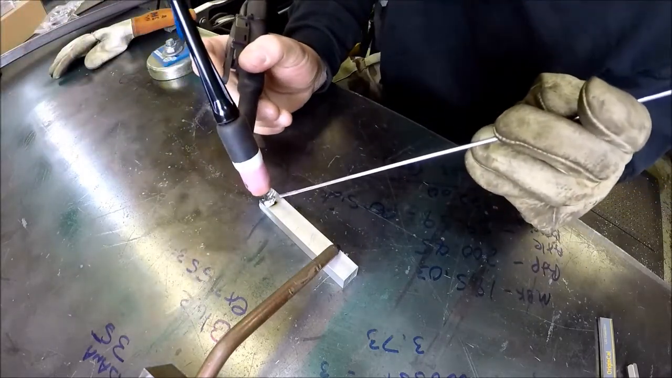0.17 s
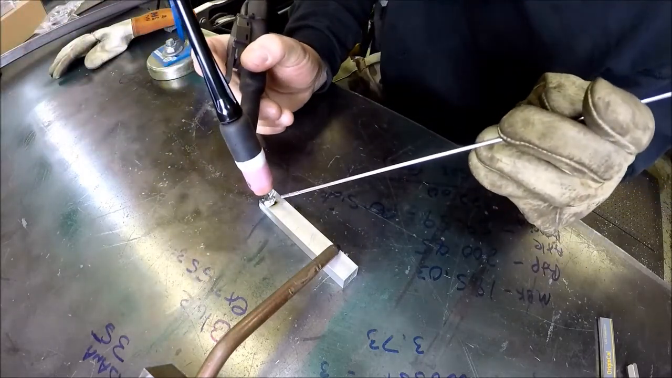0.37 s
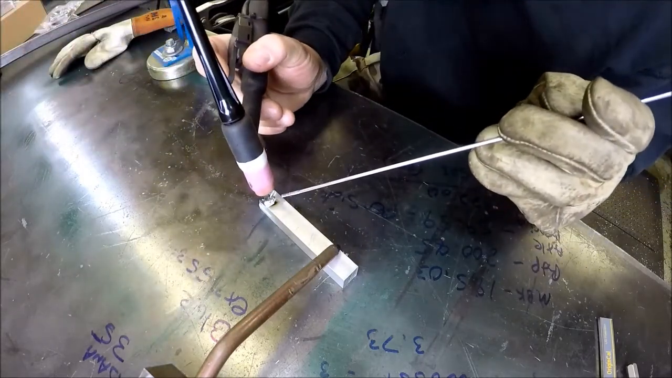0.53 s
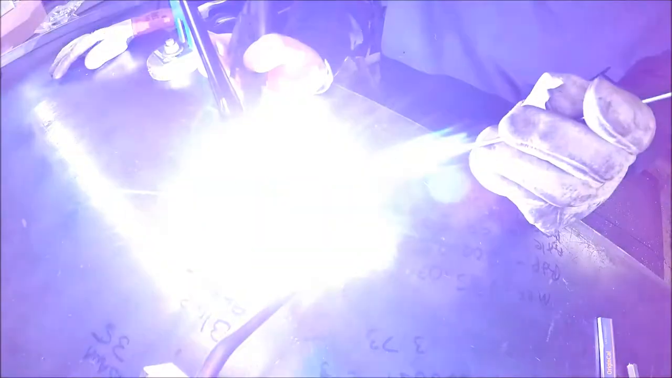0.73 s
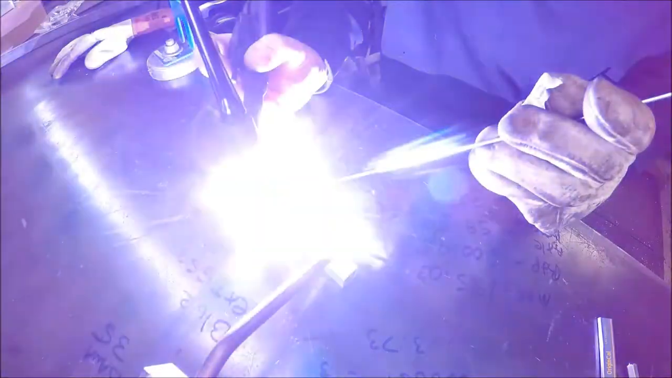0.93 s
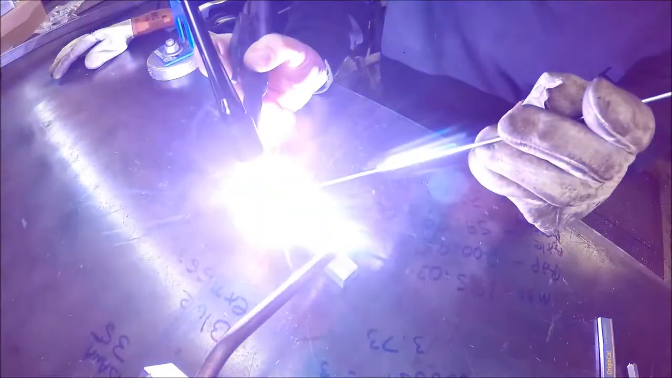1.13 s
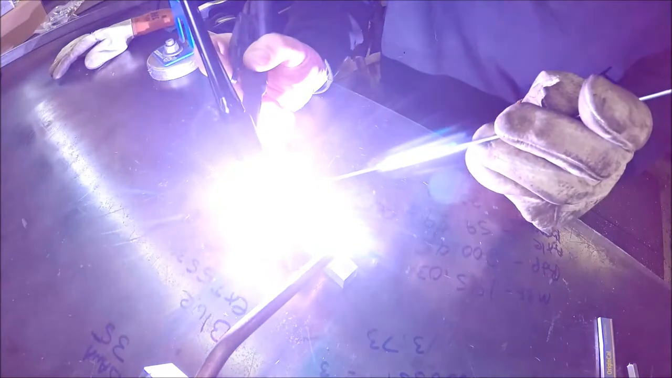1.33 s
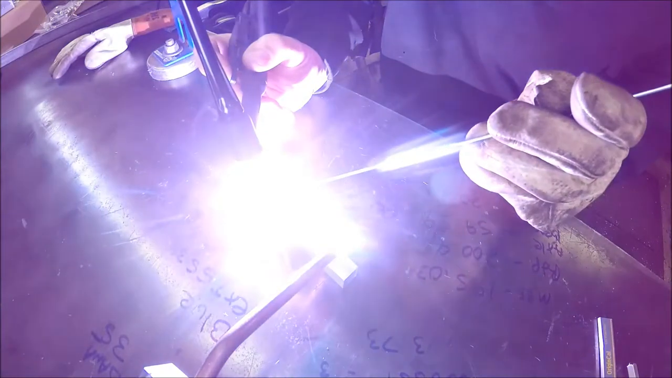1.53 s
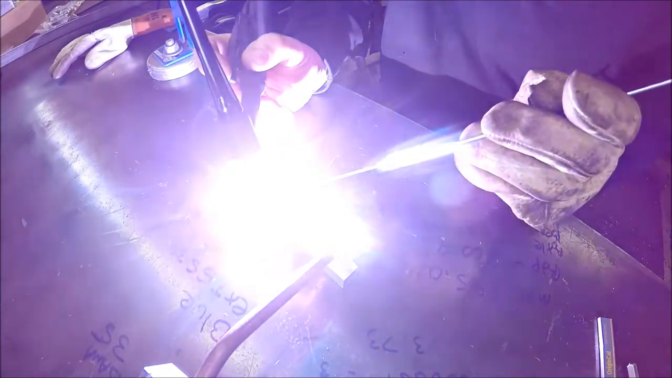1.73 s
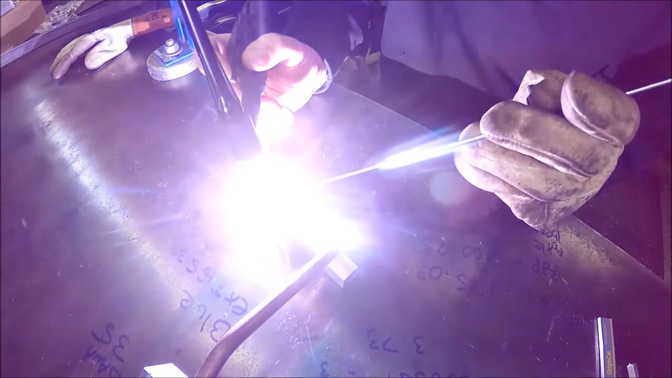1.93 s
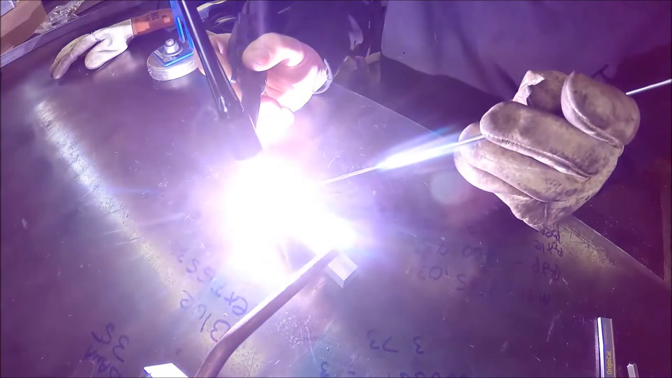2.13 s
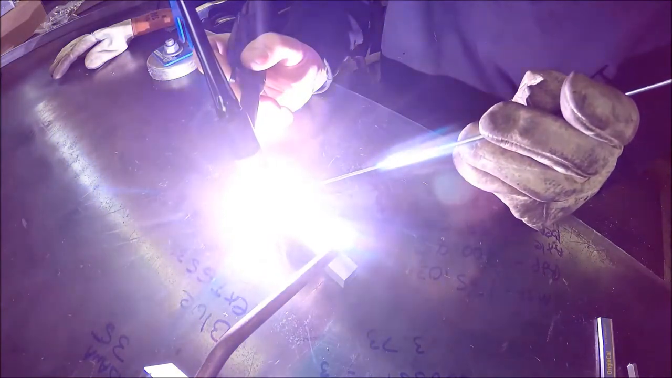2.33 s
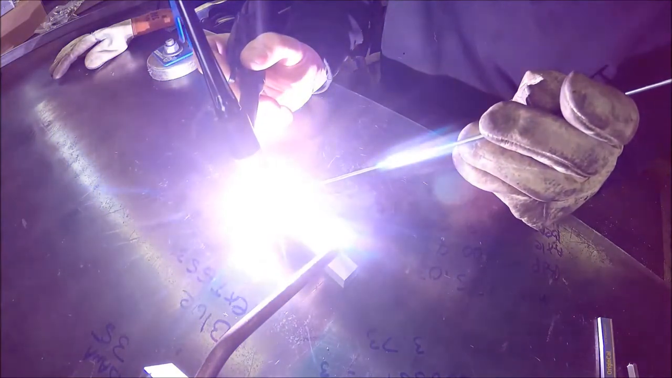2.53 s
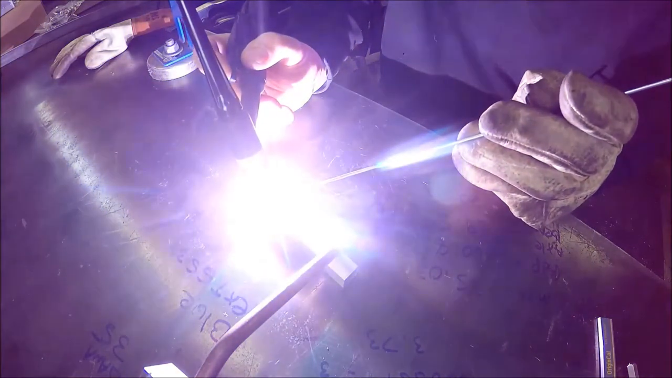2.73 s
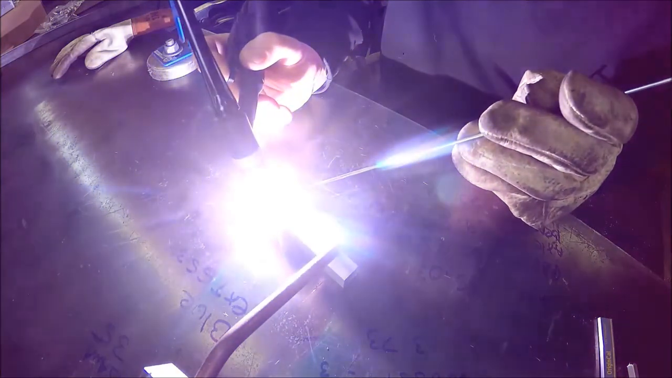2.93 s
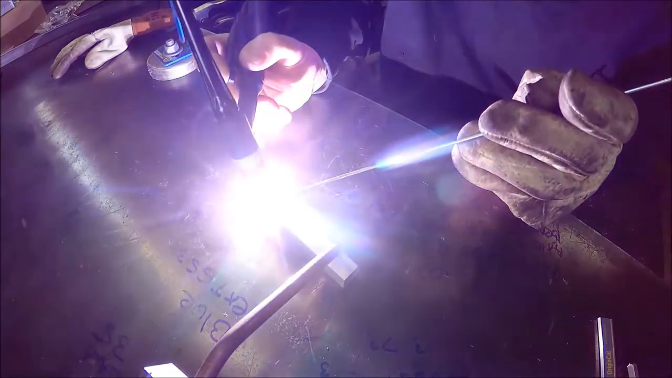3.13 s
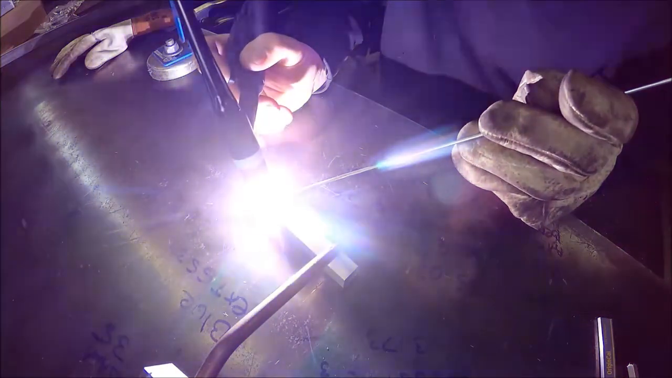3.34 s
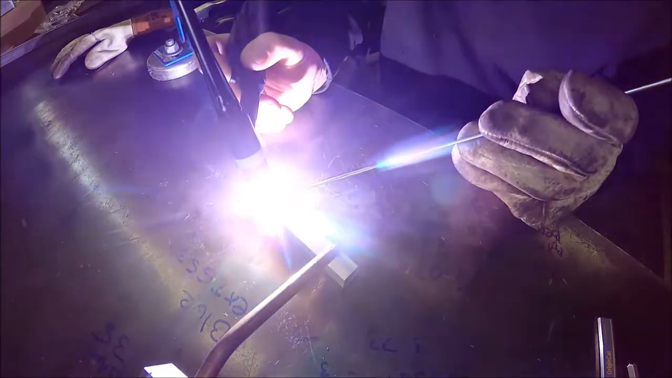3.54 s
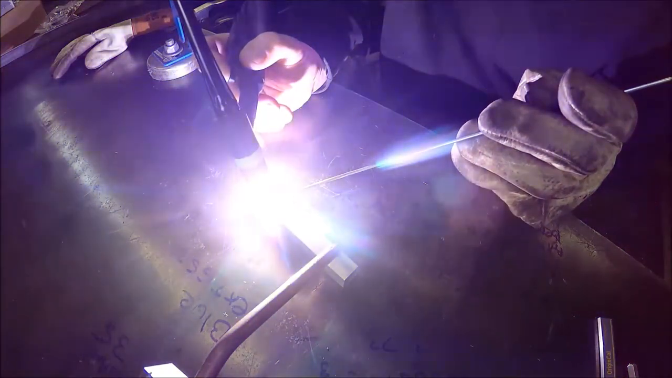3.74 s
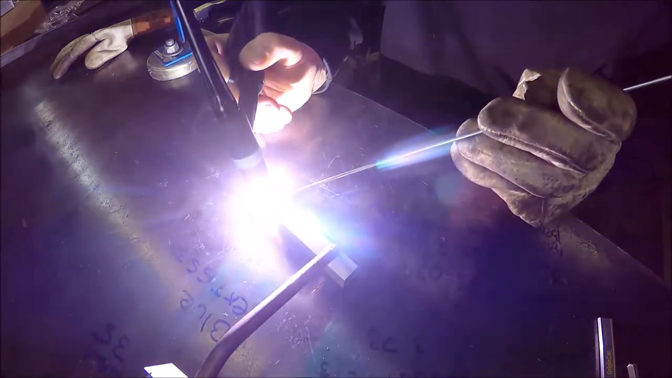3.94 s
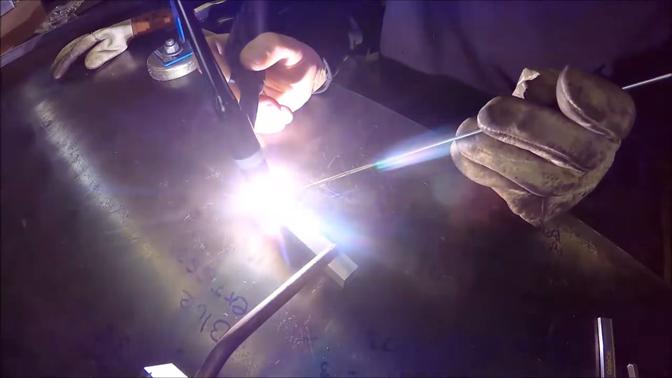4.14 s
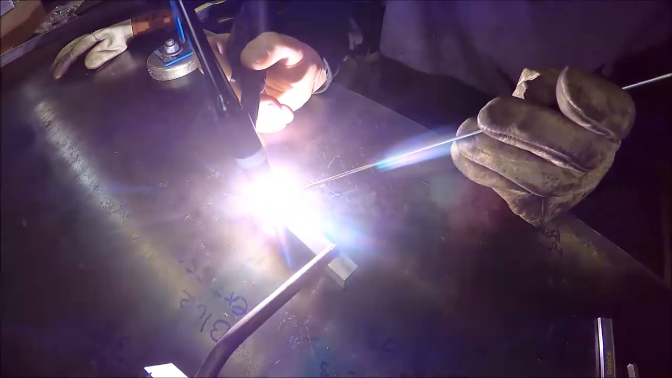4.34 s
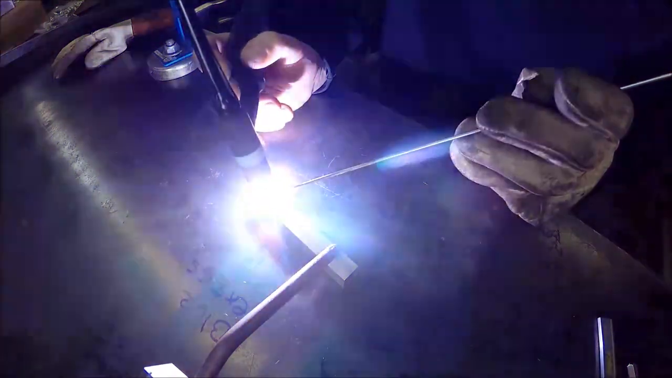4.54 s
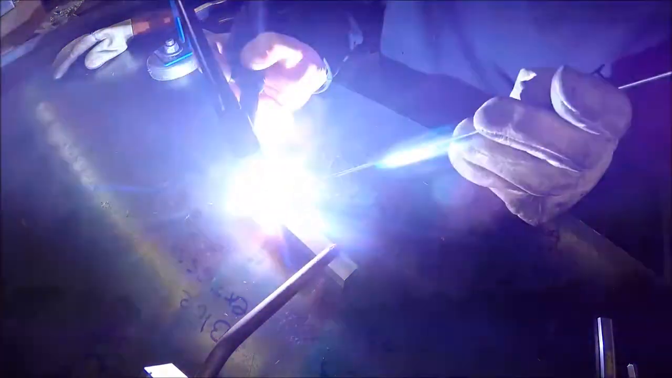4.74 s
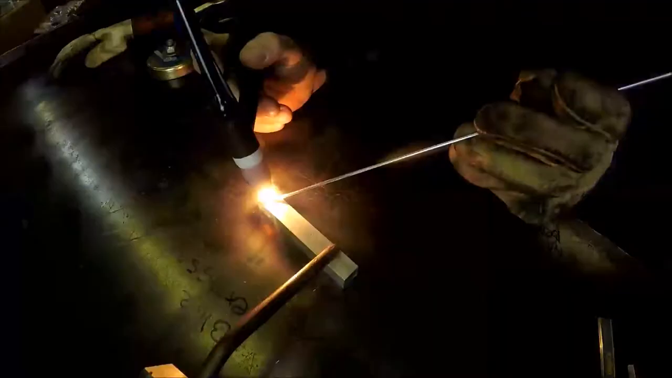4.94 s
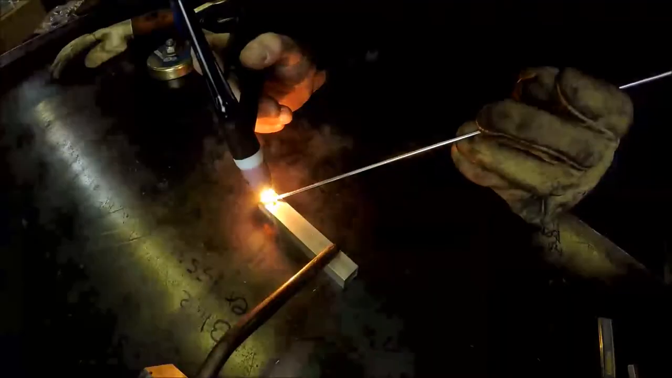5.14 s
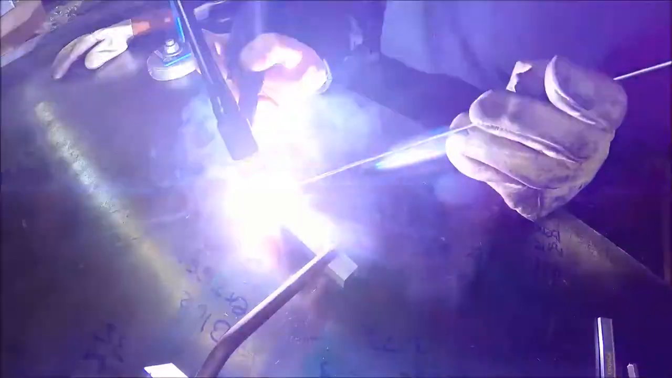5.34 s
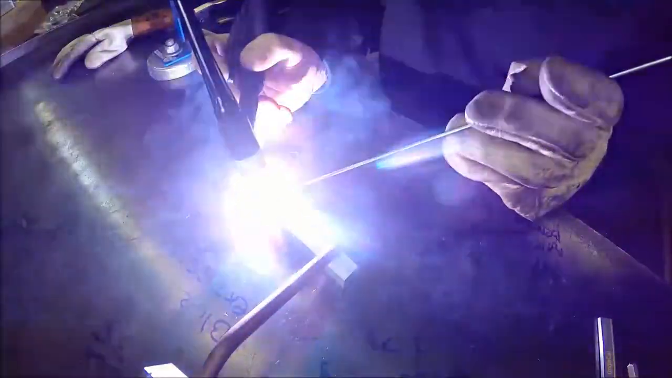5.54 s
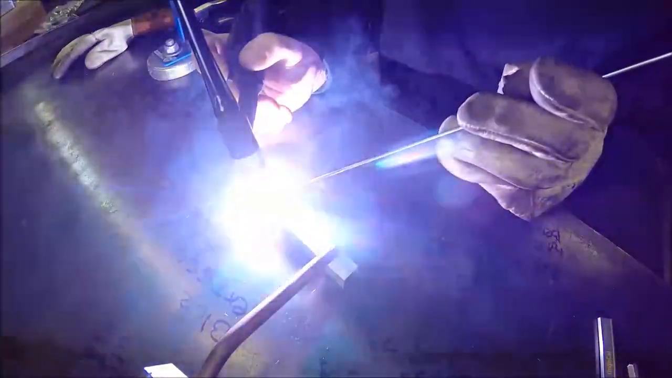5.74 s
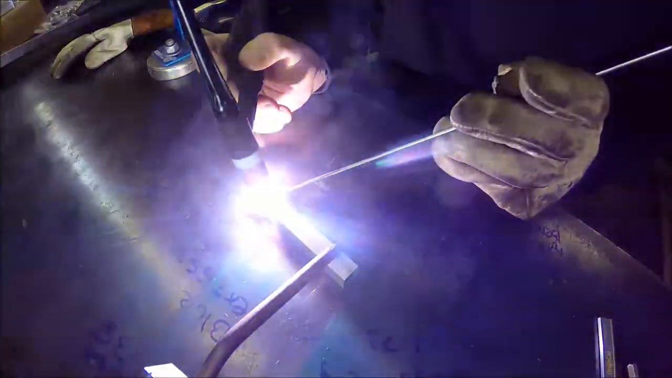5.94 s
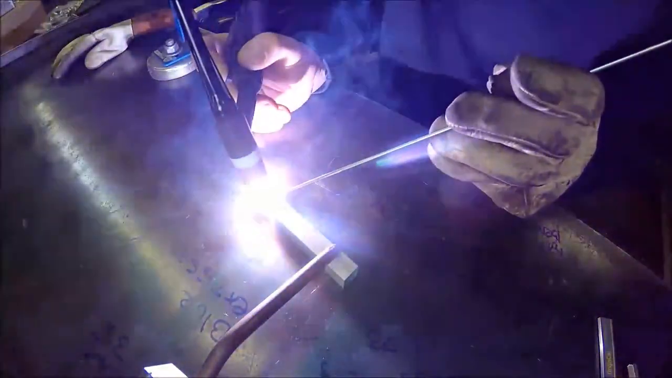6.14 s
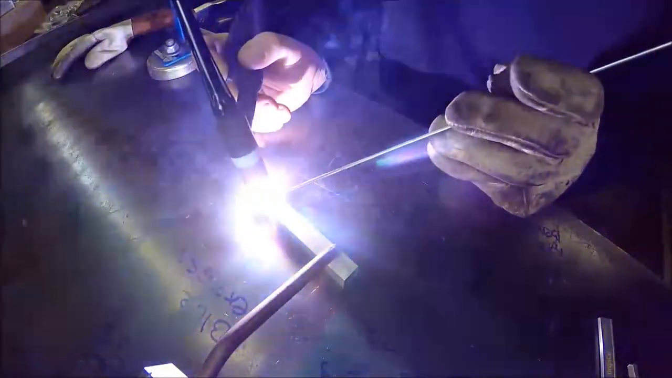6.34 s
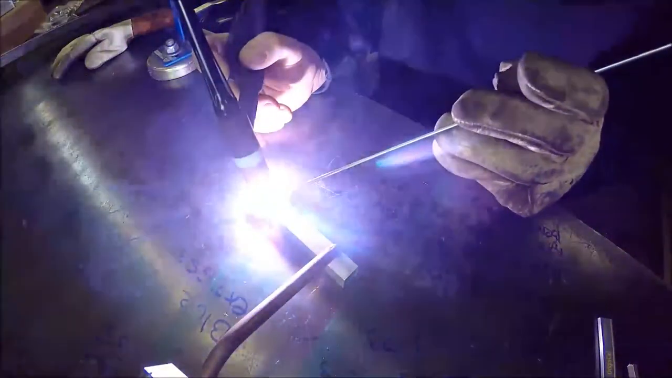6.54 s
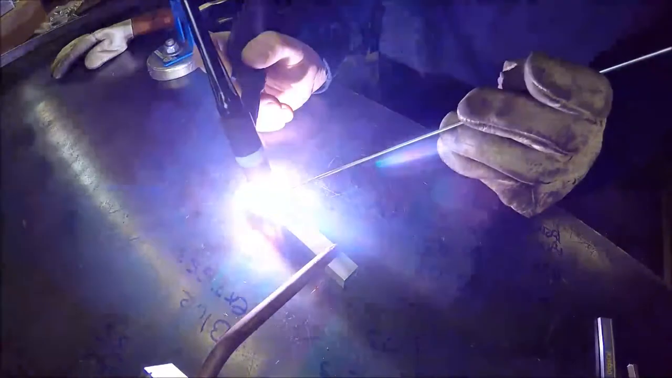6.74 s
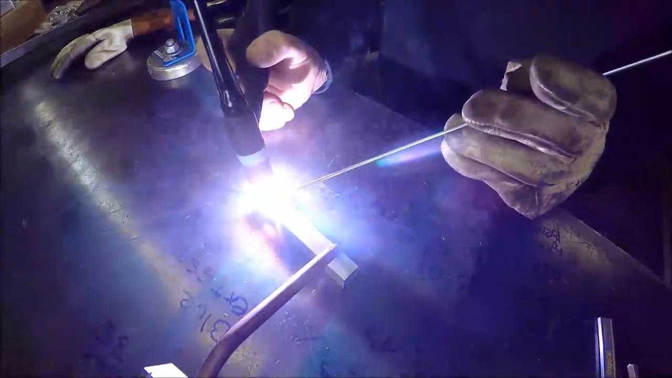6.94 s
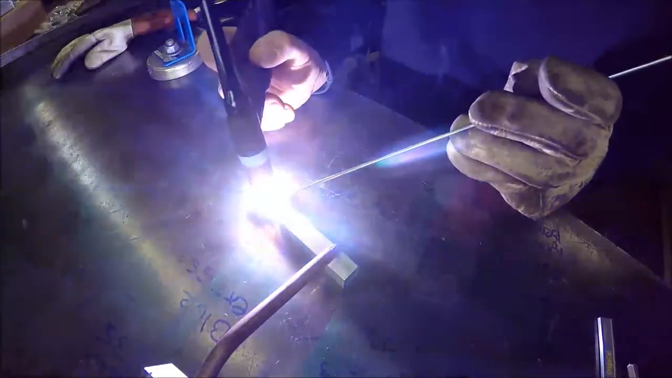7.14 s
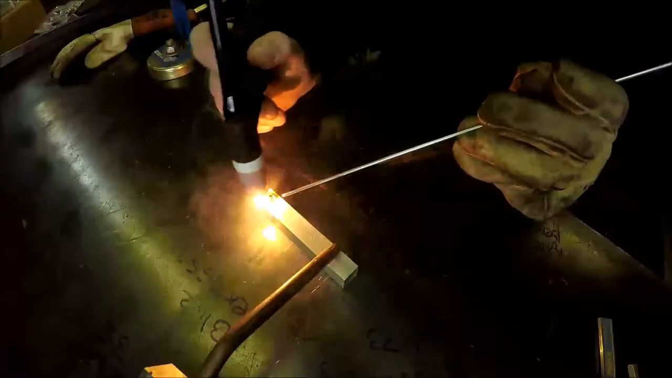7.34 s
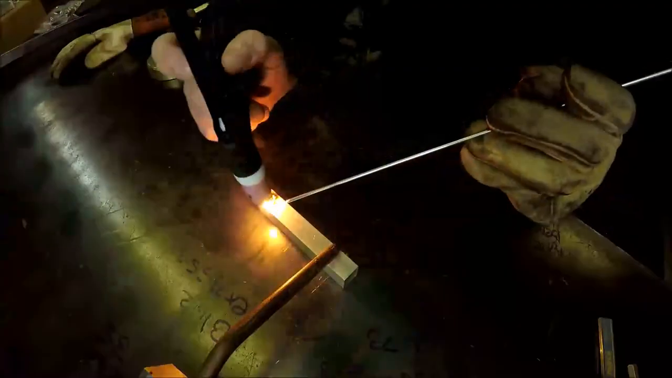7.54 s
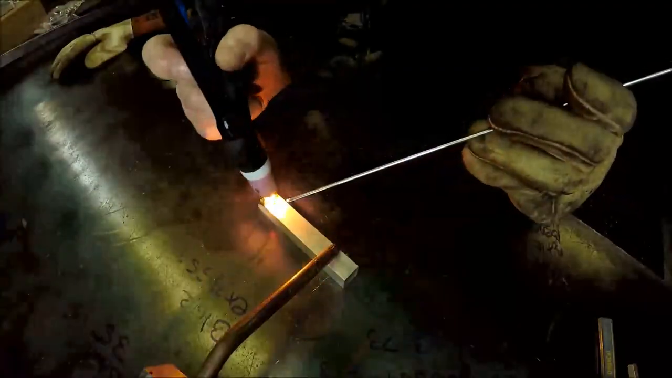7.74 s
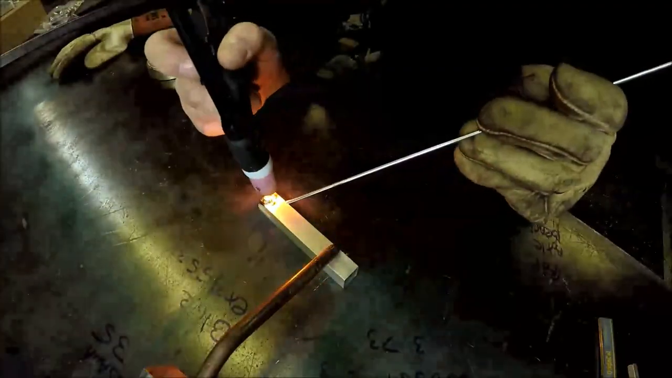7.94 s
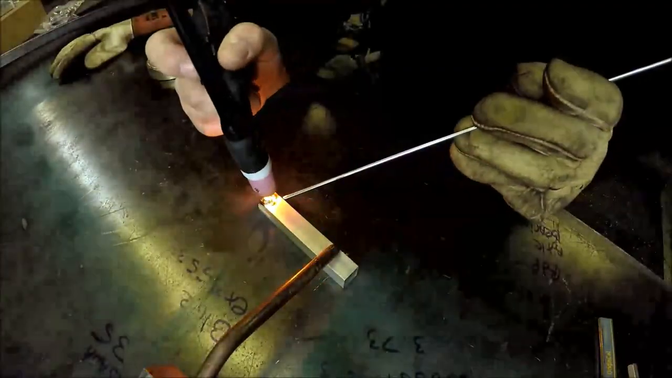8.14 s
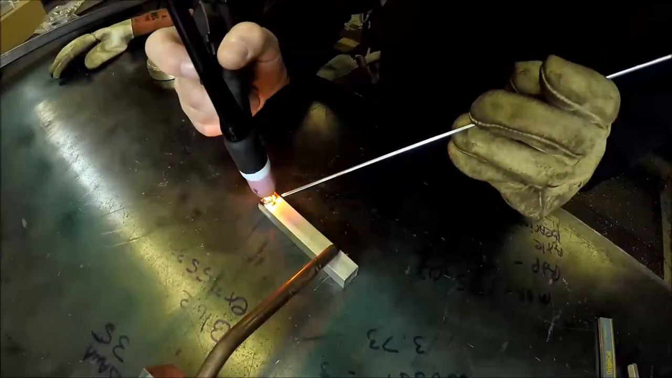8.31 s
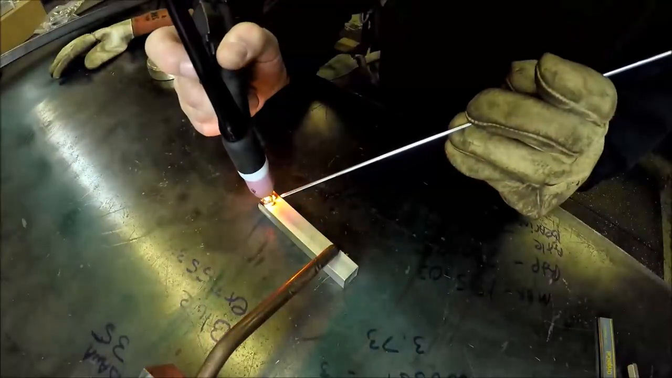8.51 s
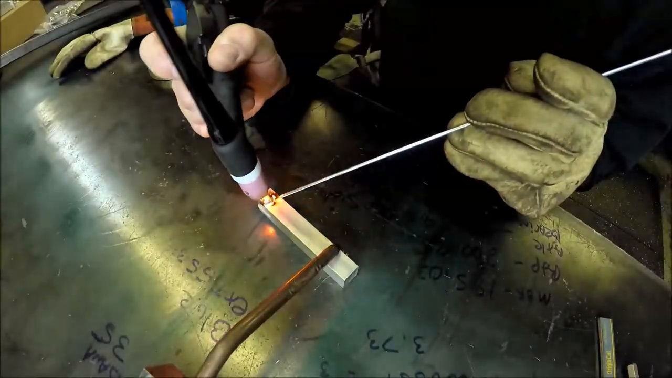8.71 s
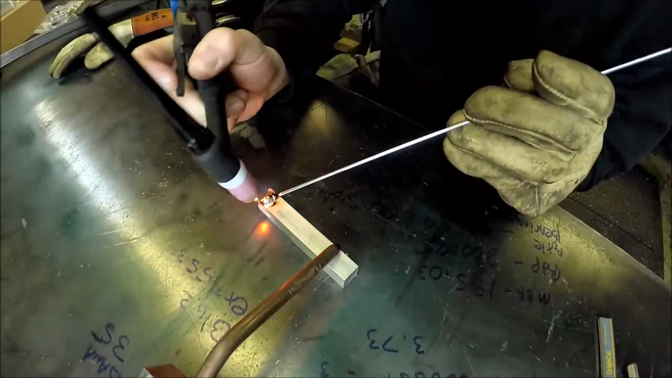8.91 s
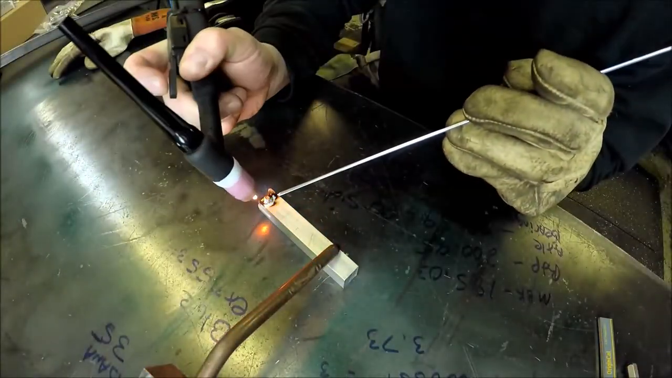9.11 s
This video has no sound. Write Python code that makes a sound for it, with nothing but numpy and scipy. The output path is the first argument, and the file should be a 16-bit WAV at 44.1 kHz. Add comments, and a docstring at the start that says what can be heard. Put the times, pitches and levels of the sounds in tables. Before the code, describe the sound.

Two bursts of loud, crackling arc buzz from welding aluminium, followed by a soft gas hiss and machine hum.

```python
"""A welder's fan hums; then come a tick, a hiss of shielding gas and the harsh rattle of an arc.
An AC TIG torch (an electric arc under gas) welds aluminium on a steel bench in two burns.
The current reverses twice a cycle, 32 cycles a second: each reversal cracks, and the short cleaning
phase between them sizzles. Gain control turns the gas and fan down while the loud arc burns."""
import sys
import numpy as np
from scipy import signal
from scipy.fft import rfft, irfft
from scipy.io import wavfile
from scipy.ndimage import uniform_filter1d, minimum_filter1d, map_coordinates

SR = 44100
rng = np.random.default_rng(int(sys.argv[2]) if len(sys.argv) > 2 else 0)


def digitize_waveform(pressure):
    """Quantize a signal to 16-bit integers and store it at the path in sys.argv[1].

    Rows of a 2-D input are taken as channels; values are limited to [-1, 1].
    """
    field = np.atleast_2d(pressure).T
    bounded = np.clip(field, -1, 1)
    quanta = np.round(bounded * 32767).astype(np.int16)
    wavfile.write(sys.argv[1], SR, quanta)


N = 404397
TIME = np.arange(N) / SR
CYCLE_HZ, CLEANING_S = 32.0105, .011045
# The arc flares and relights harder. Each row: start and length in seconds, puff and added thump in dB.
FLARES = [(.773, .041, -26, 0), (.83, 0.12, -33, 1.5), (1.82, 0.04, -33, 5), (4.475, 0.11, -29.5, 2.5),
          (4.6, 0.24, -33.5, 4), (5.575, 0.054, -34, 6.5), (5.64, .11, -44, 9)]


def amp(db):
    """Turns decibels into a gain."""
    return 10 ** (np.asarray(db) / 20)


def unit(x):
    """Scales a sound to an average level (rms) of 1."""
    return x / np.sqrt(np.mean(x ** 2) + 1e-20)


def read(points, hz):
    """Looks up a table at the given frequencies, joining its rows on a log-frequency axis."""
    row_hz, value = np.transpose(points)
    return np.interp(np.log(hz + 1), np.log(row_hz + 1), value)


def follow(rows, t):
    """Looks up each column of a timetable at the times t."""
    times, *columns = np.transpose(rows)
    return [np.interp(t, times, column) for column in columns]


def noise(colour):
    """Steady noise at rms 1. Each row of a colour: frequency in Hz, relative level in dB."""
    gain = amp(read(colour, np.fft.rfftfreq(N, 1 / SR)))
    return unit(irfft(rfft(rng.standard_normal(N)) * gain, N))


def drift(hz):
    """A random wander at rms 1, mostly slower than hz."""
    gain = np.exp(-(np.fft.rfftfreq(N, 1 / SR) / hz) ** 2)
    return unit(irfft(rfft(rng.standard_normal(N)) * gain, N))


def welder(blade_hz=383):
    """The mains hums, and the cooling fan adds a steady blade tone and a rush of air."""
    mains = [(119.8, -57), (239.6, -57)]  # Hum tones. Each row: frequency in Hz, level in dB.
    fan = [(1, -48), (2, -60.5), (3, -61), (4, -60), (5, -58.5)]  # Blade tones. Each row: multiple of the blade rate, level in dB.
    air_colour = [(20, -28), (50, 2.5), (85, -8.5), (130, 2), (170, -7), (240, 4.5), (330, -3), (560, -8.5),
                  (800, -6), (1300, -9.5), (1900, -7.5), (2600, -17), (4200, -19.5), (8000, -35),
                  (15000, -46)]  # Rushing air. Each row: frequency in Hz, relative level in dB.
    hum = sum(amp(db) * np.sin(2 * np.pi * (hz * TIME + rng.random())) for hz, db in mains)
    passes = np.cumsum(blade_hz * (1 + .002 * drift(8))) / SR
    blades = sum(amp(db + .7 * drift(10)) * np.sin(2 * np.pi * (k * passes + rng.random()))
                 for k, db in fan)
    air = amp(-42.5) * noise(air_colour) * amp(.5 * drift(22))
    return np.sqrt(2) * (hum + blades) + air


def switch(start_s=.6205, decay_s=.0015):
    """A switch gives a tiny bright tick just before the gas starts."""
    age = np.maximum(TIME - start_s, 0)
    return amp(-37.5) * (age > 0) * np.exp(-age / decay_s) * noise([(2000, -20), (6000, -2), (15000, -6)])


def gas(on_s=.763, rise_s=.012, flow_db=-40.5, surge_db=10, surge_s=1.4, work_echo_db=-8):
    """Gas surges from the torch's cup and settles; echoes make its hiss hollow, shifting as it moves."""
    # The jet's hiss and its high fizz. Each row: frequency in Hz, relative level in dB.
    hiss_colour = [(200, -0.5), (700, -5), (1800, 0.5), (2800, 5), (4200, -1), (5200, -1), (6500, 3),
                   (7500, 0), (8600, -5), (10300, 0), (11600, -14), (13500, -13), (15500, -29)]
    fizz_colour = [(8000, -40), (11500, -12), (12700, -5), (13500, -2), (14600, -3), (15600, -10)]
    # The torch moves. Each row: time in seconds, echo delay off the work in ms, fizz level in dB.
    torch = [(7.4, 0.16, -55), (7.75, .14, -50), (7.93, .18, -51), (8.08, 0.14, -54), (8.7, .14, -55),
             (8.95, .13, -46.5)]
    # Later echoes off cup and bench. Each row: final delay in ms, level in dB, sign (-1 flips the wave).
    far_echoes = [(.694, -18, -1), (.932, -18.5, 1), (1.43, -19, -1), (1.782, -20.5, 1)]
    delay_ms, fizz_db = follow(torch, TIME)
    age = np.maximum(TIME - on_s, 0)
    hiss_db = flow_db + surge_db * np.exp(-age / surge_s)
    hiss = noise(hiss_colour) * amp(hiss_db + 1.2 * drift(20))
    jet = np.minimum(age / rise_s, 1) * (hiss + noise(fizz_colour) * amp(fizz_db))
    moved_ms = delay_ms - delay_ms[-1]  # all paths change alike
    paths = [(delay_ms, amp(work_echo_db))]
    paths += [(ms + moved_ms, sign * amp(db)) for ms, db, sign in far_echoes]
    echoes = sum(gain * map_coordinates(jet, [(TIME - ms / 1000) * SR], order=3) for ms, gain in paths)
    return (jet + echoes) / np.sqrt(1 + sum(gain ** 2 for ms, gain in paths))


def room(x):
    """The workshop answers with a short wash of echoes; the highs die before the lows."""
    decay_times = [(100, 0.34), (600, 0.46), (2000, 0.18), (6000, 0.092), (15000, 0.25)]  # Each row: frequency in Hz, seconds to fade by 60 dB.
    colour = [(100, 16.5), (600, -1), (1800, -0.5), (3000, 2.5), (4200, 17), (6000, -2.5), (15000, -6)]  # The room's tone. Each row: frequency in Hz, relative level in dB.
    hz, t, spectrum = signal.stft(rng.standard_normal(SR // 2), SR, nperseg=256)
    decay = amp(read(colour, hz)[:, None] - 60 * t / read(decay_times, hz)[:, None])
    tail = signal.istft(spectrum * decay * np.minimum(t / .0023, 1), SR, nperseg=256)[1]
    return signal.oaconvolve(x, tail / np.linalg.norm(tail))[:N]


def bench(x):
    """Adds close echoes, and metal that rings faintly at each strike."""
    echoes = [(.37, -53), (.87, -34.5), (1.42, -15.5), (2.05, -20.5), (2.4, -34), (7.5, -46), (9.15, -25),
              (12.95, -30)]  # Off work, bench and welder. Each row: delay in ms, level in dB.
    # Work, bench and torch ring. Each row: pitch in Hz, relative level in dB, seconds to fade by 60 dB.
    rings = [(1286, -27.5, 0.13), (2164, -30.5, 0.11), (2640, -18.5, 0.042), (2976, -19, 0.047),
             (3145, -28, 0.092), (3698, -27, 0.047), (5794, -25.5, 0.079), (5870, -31, 0.05),
             (6882, -38, 0.042), (8963, -34, 0.11), (12340, -14.5, 0.016), (14730, -21, 0.0083)]
    out, t = x.copy(), np.arange(SR // 6) / SR
    for ms, db in echoes:
        out += amp(db) * np.interp(TIME - ms / 1000, TIME, x, left=0)
    ring = 0
    for hz, db, fade_s in rings:
        energy = fade_s * SR / (4 * np.log(1000))
        ring += amp(db - 60 * t / fade_s) * np.sin(2 * np.pi * hz * t) / np.sqrt(energy)
    return out + amp(1) * signal.oaconvolve(x, ring)[:N]


def flare_arches():
    """Each flare rises from 0 to 1 and falls back: one curve per flare."""
    return np.array([np.sin(np.pi * np.clip((TIME - s) / length, 0, 1)) for s, length, _, _ in FLARES])


def puffs():
    """The flaring arc pushes the air in low gusts."""
    gusts = amp(np.array(FLARES)[:, 2]) @ flare_arches()
    return gusts * noise([(15, -19), (40, 6), (130, 5), (300, 7), (700, -36)])


def heating(arc, span, fry_db, hold_s, treble_db, fry_fade_db_per_s=33, treble_fade_db_per_s=1):
    """The metal's cold oxide skin fries; the frying and the arc's treble fade as the metal melts."""
    fry_colour = [(100, -14), (400, -4), (700, 6), (1150, -10), (1800, 5), (2800, -6), (4300, -15),
                  (6500, -4), (10000, -13.5), (15000, -16)]  # Frying oxide. Each row: frequency in Hz, relative level in dB.
    age = np.maximum(TIME - span[0] + .027, 0)  # from ignition, just before the regular cycles
    hz = np.fft.rfftfreq(N, 1 / SR)
    treble = irfft(rfft(arc) * np.clip(.5 + (hz - 11500) / 2500, 0, 1), N)
    treble_change = (amp(treble_db - treble_fade_db_per_s * age) - 1) * treble
    level = amp(fry_db - fry_fade_db_per_s * np.maximum(age - hold_s, 0))
    frying = unit(noise(fry_colour) * amp(1.9 * drift(600)))
    return arc + treble_change + level * frying * (age > 0) * (TIME < span[1])


def strikes(times, db, colour, size=2048):
    """Short pressure pulses of one colour; db is their average level (rms) over one arc cycle."""
    log_gain = np.log(amp(read(colour, abs(np.fft.fftfreq(size, 1 / SR)))))
    pulse = np.fft.ifft(np.exp(np.conj(signal.hilbert(log_gain)))).real  # energy packed at the start
    near = np.round(times * SR).astype(int)[:, None] + np.arange(-8, 9)
    offset, train = near - times[:, None] * SR, np.zeros(N)
    np.add.at(train, near, amp(db)[:, None] * np.sinc(offset) * np.sinc(offset / 9))  # between samples
    return signal.oaconvolve(train, pulse / np.linalg.norm(pulse))[:N] * np.sqrt(SR / CYCLE_HZ)


def reversal(times, crack_db, thump_db, pop_db, thump_lead_ms=.39, pop_lead_ms=.665, jitter_ms=.0044):
    """The arc collapses and swells with a pop and a thump; the spark that relights it cracks."""
    # The tone of each part. Each row: frequency in Hz, relative level in dB.
    crack_colour = [(1200, -31.5), (2600, -2), (3100, -4.5), (3800, -10), (4500, -13.5), (5300, -4.5),
                    (6300, 2.5), (7500, 2.5), (8500, -1.5), (10000, 1.5), (11200, -8.5), (12900, -9.5),
                    (14500, -4.5), (15600, -5)]
    thump_colour = [(20, -18), (60, -28.5), (150, -14.5), (300, -4.5), (460, -2), (660, 3), (880, -1.5),
                    (1050, -6), (1200, -19), (2500, -9.5), (5000, -52.5)]
    pop_colour = [(200, -59), (1000, -50), (1250, -15), (1450, -4.5), (1700, 6.5), (2050, -1.5), (2350, -4),
                  (2900, -27.5), (4000, -24), (8000, -66.5)]
    weaker, late = rng.standard_normal((len(times), 2)).T
    crack = strikes(times, crack_db - .3 * weaker, crack_colour)
    thump = strikes(times + (jitter_ms * late - thump_lead_ms) / 1000, thump_db, thump_colour)
    pop = strikes(times + (jitter_ms * late - pop_lead_ms) / 1000, pop_db, pop_colour)
    return crack - thump - pop


def sizzle(span, opens, start_db, scatter_db, fade_db_per_s=.35):
    """The arc sizzles as it strips oxide in each cleaning phase, less as the metal heats."""
    colour = [(40, -32), (200, 1), (600, -0.5), (1150, -5.5), (1900, 0), (3000, -6.5), (4300, -13),
              (5400, -4.5), (6800, -3.5), (10000, -6), (11500, -6), (12900, -17), (14500, 1.5),
              (15600, -12.5)]  # The sizzle's tone. Each row: frequency in Hz, relative level in dB.
    patches = [(1.25, 0.24, 5.5), (2.25, 0.35, 2), (3.8, 0.43, 3), (5.68, 0.035, 5), (6.22, 0.11, 3),
               (6.56, 0.13, 5.5), (7.29, 0.064, 7)]  # Patches of oxide. Each row: centre and width in seconds, boost in dB.
    patch_db = sum(db * np.exp(-((opens - s) / width) ** 2) for s, width, db in patches)
    cycle_db = start_db - fade_db_per_s * (opens - span[0]) + patch_db + scatter_db
    cleaning = np.where((TIME - span[0]) % (1 / CYCLE_HZ) < CLEANING_S, 1, amp(-13))
    lit = (TIME > span[0]) & (TIME < opens[-1] + CLEANING_S)
    hiss = unit(noise(colour) * amp(.5 * drift(1500)))
    return hiss * amp(np.interp(TIME, opens, cycle_db)) * lit * unit(cleaning)


def burn(span, force, spark_db, closing_spark_db, opening_db, closing_db, opening_pop_db,
         sizzle_db, scatter_db, heave_db, usual_thump_db=-22, crack_fade_db_per_s=.53):
    """Reversals open and close each cleaning phase; opening and closing settings are added dB."""
    # The arc's low heave and sharp spit. Each row: frequency in Hz, relative level in dB.
    heave_colour = [(15, 10.5), (35, -1), (70, 6.5), (160, 0.5), (260, 10.5), (380, -21), (600, -45),
                    (1500, -72)]
    spit_colour = [(300, -18), (900, 8.5), (1200, -11), (1500, -1), (2500, 5.5), (3200, -5), (4000, 5.5),
                   (4800, -5), (9000, -1), (15000, 1.5)]
    opens = np.arange(*span, 1 / CYCLE_HZ)
    closes = opens + CLEANING_S
    # Levels in dB for each cycle: pops and thumps follow the force, cracks fade as the metal heats.
    push = follow(force, opens)[0]
    flare = np.interp(opens, TIME, np.array(FLARES)[:, 3] @ flare_arches())
    pop = -17 + .78 * push
    open_thump = -24 + 1.05 * push + opening_db + flare
    close_thump = -26.5 + 1.2 * push + closing_db
    crack = spark_db - crack_fade_db_per_s * (opens - span[0])
    scatter = np.clip(rng.standard_normal((len(opens), 4)), -2, 2) * [scatter_db, scatter_db, .29, 1.2]
    open_scatter, close_scatter, pop_scatter, sizzle_scatter = scatter.T
    out = reversal(opens, crack, open_thump + open_scatter, pop + opening_pop_db + flare + open_scatter)
    out += reversal(closes, crack + closing_spark_db, close_thump + close_scatter, pop + pop_scatter)
    # The hot arc swells for the cleaning phase and shrinks after it: low pushes of opposite sign.
    excess = open_thump - usual_thump_db
    heave = heave_db + .94 * excess
    out += strikes(closes, heave, heave_colour) - strikes(opens, heave, heave_colour)
    # A hard relight spits: its middle range grows faster than its thump.
    out += strikes(opens, -29 + 1.9 * np.minimum(excess + open_scatter, 3), spit_colour)
    return out + sizzle(span, opens, sizzle_db, sizzle_scatter)


def scene():
    """A first burn on cold metal and a second on hot, with gas and welder around the bench."""
    burn_times = [(.8167, 5.02), (5.4101, 7.33)]  # Each row: start and end of a burn in seconds.
    # The arc's force in each burn. Each row: time in seconds, dB above its usual force.
    first_force = [(0.82, -1), (0.94, 1.5), (1.13, -5.5), (1.47, -0.5), (2.38, 0.5), (2.47, 2), (2.78, 1),
                   (3.19, 2), (3.53, -0.5), (3.78, 1.5), (4.32, -2.5), (4.69, 2.5), (4.82, -3.0),
                   (5.0, -4.5)]
    second_force = [(5.41, -1), (5.75, -5.5), (6.0, -6), (6.38, -1.0), (6.57, -1.5), (6.66, -3.0),
                    (7.32, -2.5)]
    # The arc lights, re-strikes or breaks. Each row: time in seconds, then crack, thump and pop in dB.
    strays = [(0.7889, -21, -21.5, -21), (0.8005, -17, -19.5, -12.5), (4.4953, -14, -22.5, -22),
              (4.503, -31, -39, -37), (4.5092, -15, -31, -24), (4.5677, -31, -20.5, -21),
              (5.0338, -17.5, -26, -41), (5.039, -36, -28, -28), (5.3721, -23.5, -21, -20),
              (5.3896, -18.5, -24, -14), (5.606, -30, -25, -22), (5.6972, -37, -34, -27)]
    first, second = burn_times
    cold = burn(first, first_force, spark_db=-18, closing_spark_db=-.76, opening_db=.15, closing_db=-.1,
                opening_pop_db=-12, sizzle_db=-24.5, scatter_db=1.33, heave_db=-49)
    hot = burn(second, second_force, spark_db=-18.5, closing_spark_db=-3, opening_db=2, closing_db=-2.5,
               opening_pop_db=-14.5, sizzle_db=-26, scatter_db=2.15, heave_db=-39.5)
    cold = heating(cold, first, fry_db=-20, hold_s=.15, treble_db=1.5)
    hot = heating(hot, second, fry_db=-34, hold_s=.05, treble_db=-2.5)
    arc = bench(cold + hot + reversal(*np.transpose(strays)))
    return (arc + amp(-12) * room(arc) + puffs() + gas() + welder() + switch())[None]


def record(dry, threshold_db=-17, range_db=9, recovery_db_per_s=15, low_cut_hz=22, high_cut_hz=15600):
    """Gain control drops at once on loud peaks, holds and slowly recovers; filters trim lows and highs."""
    over_db = np.clip(20 * np.log10(abs(dry[0]) + 1e-9) - threshold_db, 0, range_db)
    held_db = -minimum_filter1d(-over_db, 3601, origin=1700)
    recovery = TIME * recovery_db_per_s
    cut_db = uniform_filter1d(np.maximum.accumulate(held_db + recovery) - recovery, size=64)
    low_cut = signal.butter(1, low_cut_hz, "high", fs=SR, output="sos")
    high_cut = signal.firwin(255, high_cut_hz, window=("kaiser", 9), fs=SR)
    ducked = np.clip(signal.sosfilt(low_cut, dry) * amp(-cut_db), -1, 1)
    return signal.oaconvolve(ducked, high_cut[None], "same")


dry = scene()
out = record(dry)
digitize_waveform(out)
```